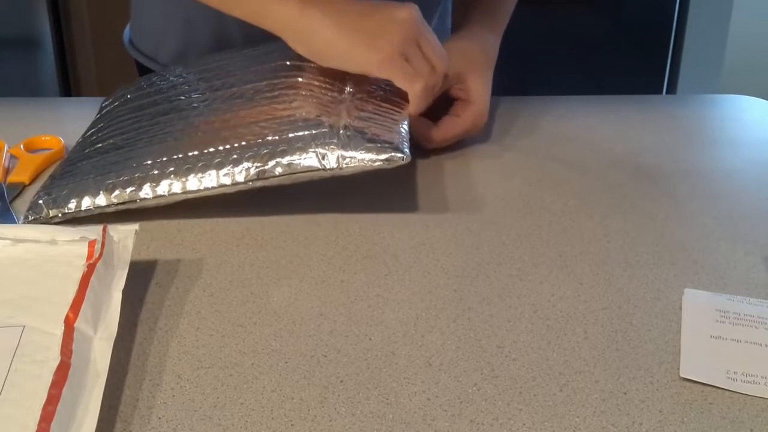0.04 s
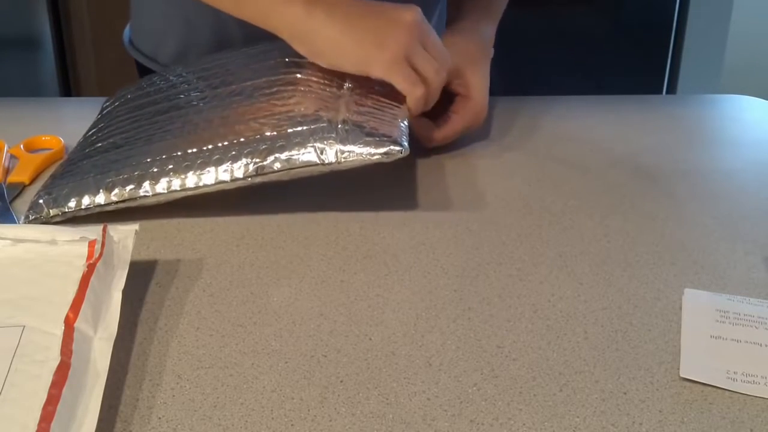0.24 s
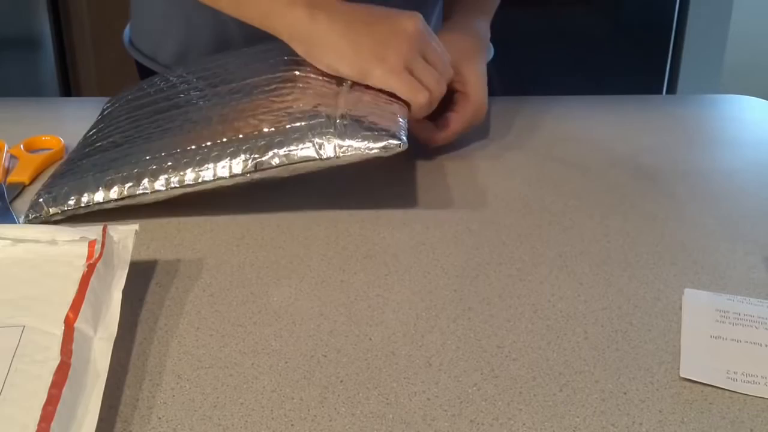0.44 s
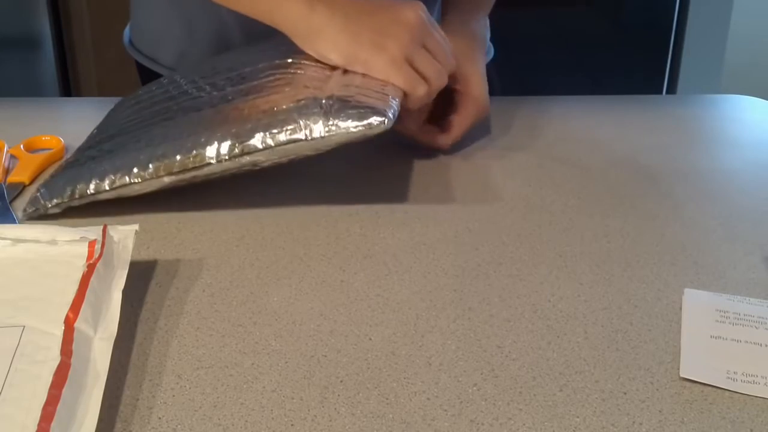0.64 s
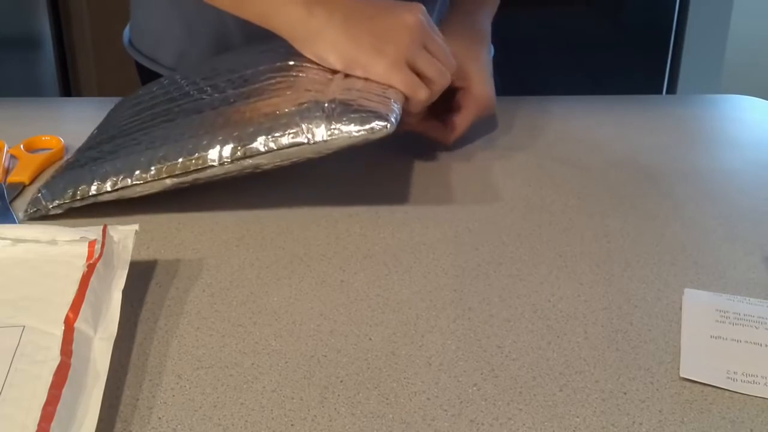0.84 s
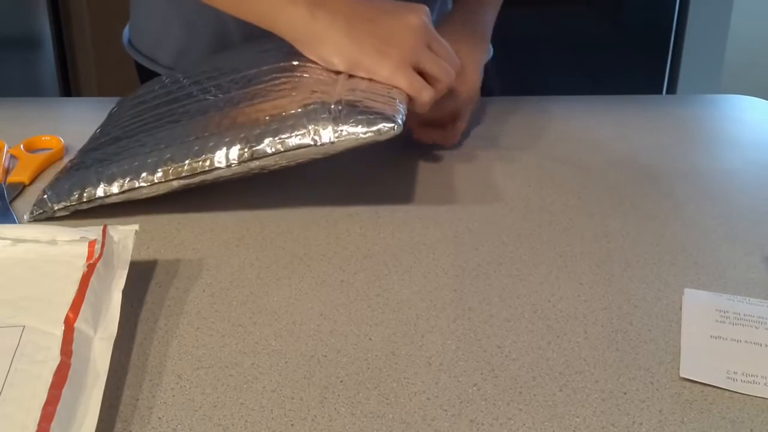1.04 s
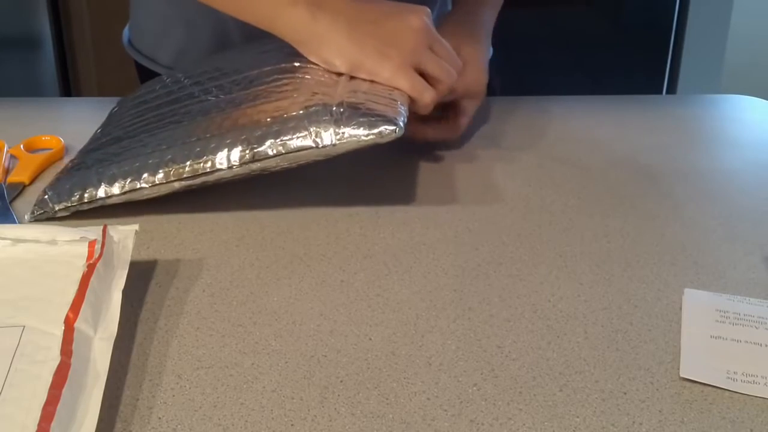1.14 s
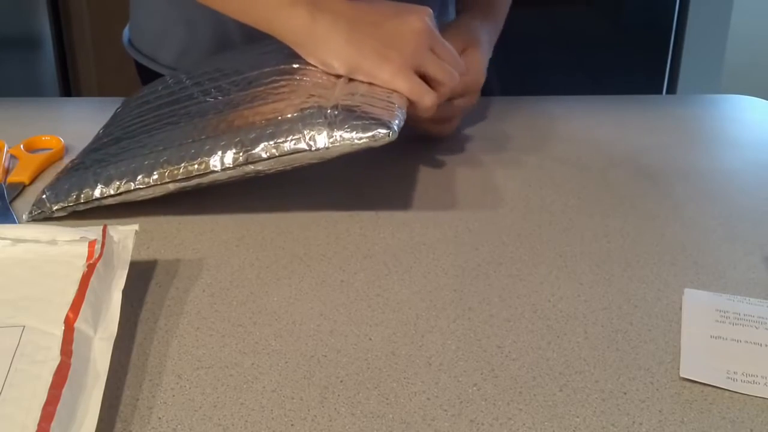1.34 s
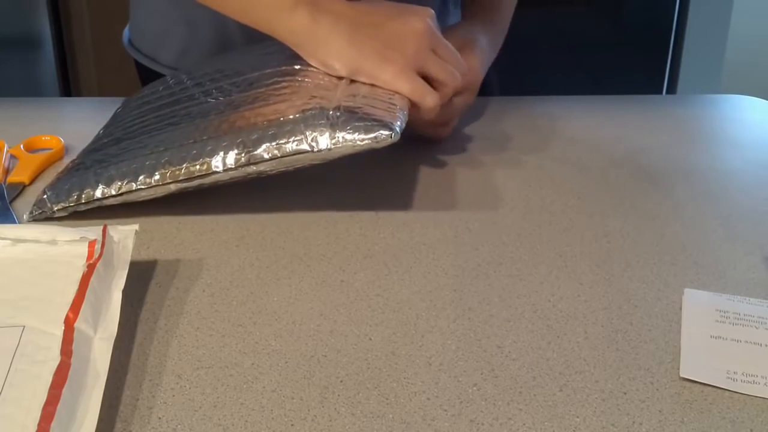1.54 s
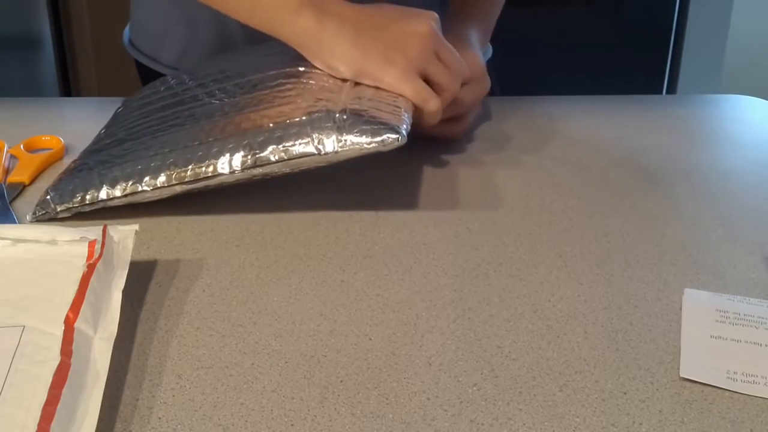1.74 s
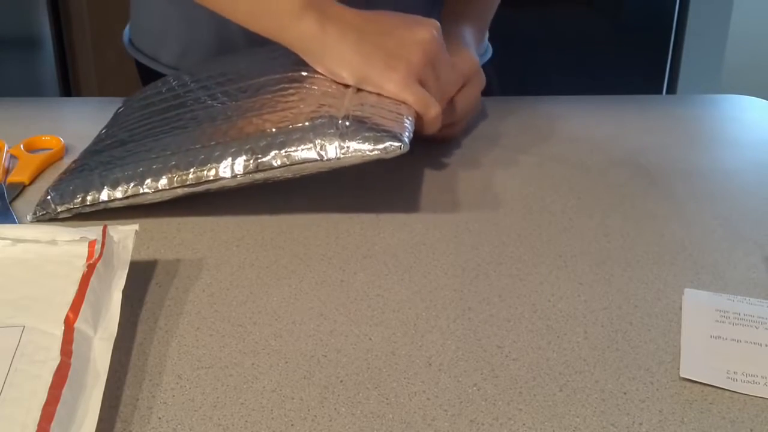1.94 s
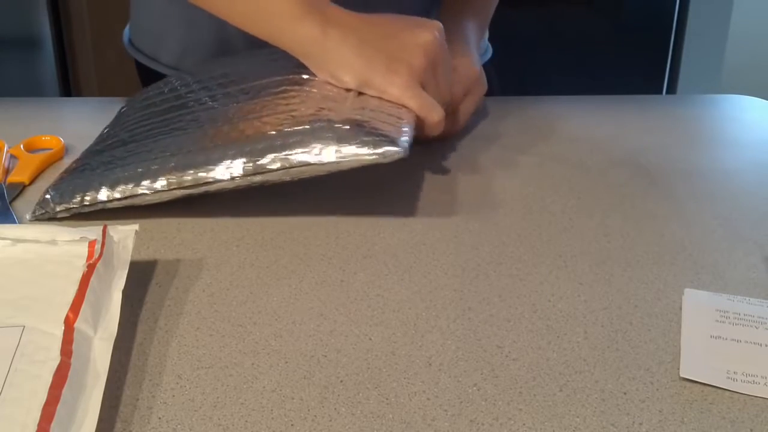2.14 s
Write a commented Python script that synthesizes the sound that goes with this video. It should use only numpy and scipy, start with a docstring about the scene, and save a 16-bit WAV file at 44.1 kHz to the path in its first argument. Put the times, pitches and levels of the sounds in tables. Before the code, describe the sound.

Foil bubble packaging crackles close to a small microphone in a lightly reverberant kitchen. Faint ticks open, a hard snap lands at 0.2 s, more at 0.45 s, then the densest crunch at 0.6-0.67 s runs into a hissing slide fading by 0.9 s. Sparse small ticks and a soft counter bump near 1.04 s follow. A second burst comes at 1.75-1.86 s, a strong snap at 1.95 s, last crackle at 2.2 s, over low hum.

```python
"""Hands pull and fold a foil bubble mailer on a kitchen counter, close to a small microphone.
From the start, noise as air and wavering sines as an appliance hum; filtered grains crackle throughout.
Gliding flicks snap faintly, hard at 0.21 s, densest at 0.59-0.67 s; damped modes knock pouch and counter.
Dense filtered clicks hiss from 0.65 s as the fold slides, dying by 0.93 s; snaps then turn sparse.
A second burst comes at 1.74-1.86 s, a strong snap at 1.95 s, the last at 2.2 s."""
import sys
import numpy as np
from scipy import signal
from scipy.io import wavfile
from scipy.ndimage import uniform_filter1d

SR = 44100
rng = np.random.default_rng(int(sys.argv[2]) if len(sys.argv) > 2 else 0)


def gain_from_db(level_db):
    """Convert decibel levels to linear amplitude factors (20 dB per decade)."""
    decades = np.asarray(level_db, float) / 20
    return 10 ** decades


def generate_wav(signal):
    """Clip the signal to [-1, 1] and save it as 16-bit WAV at the path in sys.argv[1]."""
    frames = np.transpose(np.atleast_2d(signal))
    scaled = np.clip(frames, -1, 1) * 32767
    pcm = np.round(scaled).astype(np.int16)
    wavfile.write(sys.argv[1], SR, pcm)


N = 97020

# room air spectrum, relative: frequency_hz, gain_db
AIR_TONE = [(15, -53), (25, -45.5), (79, -1), (159, -3), (270, -3.5), (327, -9), (387, -10), (656, -5),
            (706, -9.5), (1840, -17), (2290, -20.5), (6920, -23.5), (7800, -17.5), (10100, -33.5),
            (17200, -120)]
# appliance hum partials: pitch_hz, level_db (rms)
HUM_PARTIALS = [(161.5, -66), (327, -58), (652, -61)]
# kitchen reverberation: frequency_hz, t60_s
KITCHEN_DECAY = [(200, 0.9), (600, 0.57), (1500, 0.42), (4000, 0.33), (8000, 0.31)]
# bag thumping the counter: start_s, level_db, pitch_hz
COUNTER_BUMPS = [(.225, -34.5, 139), (.25, -38, 133), (.445, -41, 140), (0.602, -36, 203), (.62, -38, 130),
                 (.65, -37, 110), (.77, -46, 95), (.9, -44, 94), (1.042, -30, 110), (1.06, -39.5, 115),
                 (1.745, -38, 152), (1.819, -47, 120)]
# counter modes: pitch_multiple, level_db (added to the bump's), t60_s
COUNTER_MODES = [(1, 0, .17), (1.5, -8, .1)]
# fingers knocking the hollow pouch: start_s, level_db, pitch_hz
POUCH_KNOCKS = [(.209, -26, 868), (.443, -34, 492), (.605, -27.5, 296), (.636, -40.5, 850),
                (.664, -25, 547), (.9618, -30.5, 723), (1.0362, -38, 441), (1.502, -36.5, 427),
                (1.7425, -25, 596), (1.798, -39, 700), (1.812, -23.5, 780), (1.838, -27, 692),
                (1.908, -28, 884), (1.945, -22, 593), (1.96, -38, 600)]
# hollow pouch modes: pitch_multiple, level_db (added to the knock's), t60_s
POUCH_MODES = [(1, 3.5, 0.034), (1.42, 0.5, 0.026)]
# fold sliding, silent outside: time_s, level_db
SLIDE_LEVEL = [(0.65, -27), (0.658, -26.5), (0.664, -25), (0.678, -26.5), (0.696, -19), (0.908, -47.5),
               (0.922, -51), (0.93, -56)]
# sliding foil spectrum, relative: frequency_hz, gain_db
SLIDE_SPECTRUM = [(120, -28), (200, -13), (451, -17.5), (487, -9), (725, -7), (795, -0.5), (1110, -2.5),
                  (1260, -9), (1340, -5), (1710, 0.5), (2430, -3), (3060, -12), (3510, -1), (3970, -15.5),
                  (4360, -6.5), (6590, -5), (7800, -14.5), (10100, -59.5), (17200, -120)]
# tension of the hands, as crackle level: time_s, level_db
HAND_TENSION = [(0, -51.5), (.19, -59), (.26, -44), (.37, -52), (.45, -29), (.53, -43.5), (.6, -33.5),
                (.66, -32.5), (.85, -48), (1.0, -48), (1.15, -54.5), (1.38, -48), (1.55, -56.5),
                (1.73, -58.5), (1.76, -51), (1.83, -34.5), (1.89, -49), (1.97, -40.5), (2.05, -46.5),
                (2.12, -47), (2.2, -39)]
# crackling foil spectrum, relative: frequency_hz, gain_db
CRACKLE_TONE = [(120, -38), (200, -14), (312, -8), (387, -42), (502, -13.5), (1200, -10.5), (4780, -7),
                (6100, -8), (7220, -2), (7800, -17), (10100, 4.5), (17200, -120)]
# creases snapping: time_s, pouch_db, sheet_db, bright_db, pouch_hz
CREASE_SNAPS = [(0.0255, -47.5, -51.5, -35.5, 660), (0.0624, -43.5, -45, -32, 570),
                (0.1223, -52, -51, -34, 620), (0.2097, -18, -16.5, -10.5, 1430),
                (0.2193, -30.5, -36, -28, 550), (0.2779, -37, -40, -25.5, 1780),
                (0.3431, -35.5, -24.5, -25, 1830), (0.4002, -37.5, -39.5, -20.5, 1780),
                (0.4189, -28, -36, -31, 1430), (0.4245, -20, -32, -25, 1210),
                (0.4436, -19.5, -20.5, -5.5, 1250), (0.449, -25.5, -27.5, -19.5, 1100),
                (0.454, -23.5, -30.5, -22.5, 1000), (0.4679, -29.5, -29, -18.5, 2010),
                (0.493, -36, -33, -22.5, 2170), (0.5475, -41.5, -34, -23, 2080),
                (0.557, -36, -23, -8.5, 1670), (0.5867, -19.5, -15, -8, 2080),
                (0.6041, -13.5, -9.5, -14, 2120), (0.6057, -19.5, -11, -12, 2020),
                (0.619, -14.5, -8.5, -15.5, 2110), (0.6216, -13.5, -15.5, -13, 1270),
                (0.6312, -13.5, -9.5, -10.5, 870), (0.6364, -9.5, -15, -6.5, 830),
                (0.6398, -5, -20.5, -4, 1630), (0.6434, -14, -19, -14.5, 1300),
                (0.6451, -19.5, -23, -20.5, 1390), (0.6648, -8.5, -15, -10.5, 1600),
                (0.6675, -17.5, -16.5, -14, 1530), (0.8788, -29, -37, -36.5, 800),
                (0.9208, -28.5, -40.5, -42, 1250), (0.9627, -23, -14.5, -23, 730),
                (0.998, -35, -38, -34.5, 1230), (1.0371, -28.5, -32, -32, 500),
                (1.0554, -33, -45, -51, 1040), (1.1712, -41.5, -40.5, -39.5, 1180),
                (1.2245, -27.5, -40, -51, 1850), (1.2527, -25.5, -28, -29.5, 1010),
                (1.3409, -40, -32, -18, 1170), (1.351, -42, -42, -33.5, 1200),
                (1.39, -33.5, -41, -34.5, 1280), (1.3953, -44, -43.5, -36, 1300),
                (1.409, -40, -42, -33, 1500), (1.4221, -36, -38, -30.5, 1890),
                (1.503, -27, -30.5, -19.5, 1310), (1.6242, -43, -46, -50, 1090),
                (1.6461, -43.5, -39, -35.5, 690), (1.6877, -34.5, -35, -42, 1230),
                (1.7365, -29, -24.5, -21, 1590), (1.7428, -17.5, -25.5, -15, 2100),
                (1.7459, -22, -28, -16.5, 590), (1.785, -26.5, -30, -25, 1790),
                (1.7933, -32.5, -31.5, -39, 1990), (1.7984, -27.5, -38, -36, 690),
                (1.8014, -30, -30, -17, 2050), (1.8121, -16, -12, -12, 2140),
                (1.8154, -21.5, -20, -12, 2090), (1.8168, -23.5, -22.5, -20, 730),
                (1.8238, -27.5, -27.5, -26, 690), (1.8304, -29.5, -31, -21, 720),
                (1.8405, -27, -30, -30, 710), (1.8622, -32, -26, -24, 500),
                (1.9085, -17, -21.5, -22.5, 1680), (1.9455, -8.5, -9.5, -8.5, 1230),
                (1.981, -36, -32, -34, 1500), (2.019, -40.5, -38, -19, 1990),
                (2.0265, -40, -39, -27.5, 1800), (2.042, -26, -21.5, -17.5, 1220),
                (2.1468, -38, -29, -40, 650), (2.1506, -36, -26, -29, 1290), (2.189, -33.5, -31, -37, 1310),
                (2.1982, -21, -17.5, -29, 1270)]

AIR_DB = -50
HUM_WAVER_DB, HUM_WOBBLE_RAD = 1.5, .25  # rms level waver, rms phase wobble
KITCHEN_DB, KITCHEN_FADE_IN_S = -9, 0.0013
BUMP_CONTACT_S, KNOCK_CONTACT_S = 0.0063, 0.00074  # length of the soft contact
SLIDE_GRAINS_PER_S, SLIDE_SIZE_DB, SLIDE_PATCHY_DB = 9000, 2.5, 1.2
CRACKLES_PER_S, CRACKLE_SIZE_DB, CRACKLE_PEAK_CYCLES = 2100, 2, 1.1
POUCH_PEAK_CYCLES = .85  # cycles until the pouch ring peaks
SHEET_HZ, SHEET_PEAK_S = 3710, .0005
BRIGHT_HZ, BRIGHT_PEAK_S = 6094, .0005
PITCH_SPREAD = .045  # sheet and bright pitch vary by this fraction (sd)
RATTLE_DB, RATTLE_T60_S, RATTLE_SHARE = -2, 0.037, 0.088  # before colouring; share of samples that fire
GLIDE_PER_S = 134  # upward glide of each ring, as a fraction of its pitch per second
FOIL_LOW_HZ = 280  # thin foil radiates little bass
CEILING = .75  # soft limit of the microphone, linear
EDGE_HZ, LOW_HZ = 7490, 80.4


def evened(x):
    """Scales to unit rms."""
    return x / np.sqrt(np.mean(x ** 2) + 1e-20)


def read(points, hz):
    """Reads a table along log frequency."""
    f_hz, value = np.transpose(points)
    return np.interp(np.log(hz + 1), np.log(f_hz + 1), value)


def curve(points):
    """Gain over time; a table that starts late is silent outside its span."""
    time_s, db = np.transpose(points)
    left_db, right_db = (db[0], db[-1]) if time_s[0] < .1 else (-120, -120)
    return gain_from_db(np.interp(np.arange(N) / SR, time_s, db, left=left_db, right=right_db))


def add(mix, start_s, sound):
    """Adds a sound in place, cut at the end of the mix."""
    part = mix[round(start_s * SR):][:len(sound)]
    part += sound[:len(part)]


def coloured(x, tone):
    """Minimum-phase filter with the given spectrum, floored at -80 dB."""
    gain_db = np.maximum(read(tone, abs(np.fft.fftfreq(4096, 1 / SR))), -80)
    log_gain = np.log(gain_from_db(gain_db))
    taps = np.fft.ifft(np.exp(np.conj(signal.hilbert(log_gain)))).real[:2048]
    return signal.oaconvolve(x, taps)[:N]


def ring(hz, db, t60_s):
    """One exponentially dying mode."""
    t = np.arange(round(t60_s * SR) + 8) / SR
    return gain_from_db(db - 60 * t / t60_s) * np.sin(2 * np.pi * hz * t)


def struck(blows, modes, contact_s):
    """Blows into damped modes, each blow at its own pitch; a soft contact dulls the onset."""
    out = np.zeros(N)
    push = np.hanning(round(contact_s * SR) + 3)
    push = push / push.sum()
    for start_s, db, hz in blows:
        for multiple, mode_db, t60_s in modes:
            add(out, start_s, np.convolve(ring(hz * multiple, db + mode_db, t60_s), push))
    return out


def clicks(per_s, size_db):
    """Sparse clicks of random sign, a few of them large."""
    size = gain_from_db(size_db * np.minimum(rng.exponential(1, N), 4))
    return size * rng.choice([-1., 1.], N) * (rng.random(N) < per_s / SR)


def flick(hz, db, peak_s, turn):
    """A few cycles that swell, glide upward through hz at the peak, and die."""
    t = np.arange(512) / SR
    cycles = hz * (t + GLIDE_PER_S * (t / 2 - peak_s) * np.minimum(t, 4 * peak_s))
    swell = (t / peak_s * np.exp(1 - t / peak_s)) ** 2
    return gain_from_db(db) * swell * np.sin(2 * np.pi * (cycles + turn))


def grains(per_s, size_db, tone):
    """Small creases, each a flick at one of 16 pitches."""
    pitches_hz = np.geomspace(500, 7500, 16)
    out = np.zeros(N)
    for hz in pitches_hz:
        shape = hz * flick(hz, 0, CRACKLE_PEAK_CYCLES / hz, 0)
        out += signal.oaconvolve(clicks(per_s / len(pitches_hz), size_db), shape)[:N]
    return evened(coloured(out, tone))


def slow_drift():
    """Unit-rms sum of sines between 2 and 12 Hz."""
    t = np.arange(N) / SR
    return evened(sum(np.sin(2 * np.pi * (hz * t + rng.random())) for hz in np.geomspace(2, 12, 12)))


def air():
    """Room air: steady filtered noise."""
    return gain_from_db(AIR_DB) * evened(coloured(rng.standard_normal(N), AIR_TONE))


def hum():
    """Appliance hum: partials that waver in level and phase."""
    t, out = np.arange(N) / SR, np.zeros(N)
    for hz, db in HUM_PARTIALS:
        gain = np.sqrt(2) * gain_from_db(db + HUM_WAVER_DB * slow_drift())
        out += gain * np.sin(2 * np.pi * hz * t + HUM_WOBBLE_RAD * slow_drift())
    return out


def kitchen(x):
    """Dense noise tail, each band dying at its own speed."""
    noise = rng.standard_normal(SR // 2)
    hz, t, z = signal.stft(noise, SR, nperseg=128)
    decay = gain_from_db(-60 * t / read(KITCHEN_DECAY, hz)[:, None])
    tail = signal.istft(z * decay, SR, nperseg=128)[1]
    tail = tail * np.clip(np.arange(len(tail)) / SR / KITCHEN_FADE_IN_S, 0, 1)
    return gain_from_db(KITCHEN_DB) * signal.fftconvolve(x, tail / np.linalg.norm(tail))[:N]


def bumps():
    """The bag thumps the counter, exciting low modes."""
    return struck(COUNTER_BUMPS, COUNTER_MODES, BUMP_CONTACT_S)


def knocks():
    """Fingers knock the hollow pouch; its pitch follows the grip."""
    return struck(POUCH_KNOCKS, POUCH_MODES, KNOCK_CONTACT_S)


def slide():
    """Dense slips of foil on foil, uneven in time and pitch."""
    slips = coloured(clicks(SLIDE_GRAINS_PER_S, SLIDE_SIZE_DB), SLIDE_SPECTRUM)
    z = signal.stft(slips, nperseg=128)[2]
    patches = uniform_filter1d(rng.standard_normal(z.shape), 3, axis=0)
    patches = evened(uniform_filter1d(patches, 8, axis=1))
    rough = signal.istft(z * gain_from_db(SLIDE_PATCHY_DB * patches), nperseg=128)[1][:N]
    return curve(SLIDE_LEVEL) * evened(rough)


def crackle():
    """Tiny creases, as strong as the hands pull."""
    return curve(HAND_TENSION) * grains(CRACKLES_PER_S, CRACKLE_SIZE_DB, CRACKLE_TONE)


def snaps():
    """Each crease flicks pouch, sheet and bright ring, then neighbouring creases let go in a rattle."""
    out, rattle = np.zeros(N), np.zeros(N)
    t = np.arange(2048) / SR
    rattle_gain = gain_from_db(RATTLE_DB - 60 * t / RATTLE_T60_S) / np.sqrt(RATTLE_SHARE)
    for time_s, pouch_db, sheet_db, bright_db, pouch_hz in CREASE_SNAPS:
        sheet_luck, bright_luck, pouch_turn, sheet_turn, bright_turn = rng.standard_normal(5)
        sheet_hz = SHEET_HZ * (1 + PITCH_SPREAD * sheet_luck)
        bright_hz = BRIGHT_HZ * (1 + PITCH_SPREAD * bright_luck)
        pouch_peak_s = POUCH_PEAK_CYCLES / pouch_hz
        # start early: each ring peaks just before time_s
        add(out, time_s - pouch_peak_s - .0004, flick(pouch_hz, pouch_db, pouch_peak_s, pouch_turn))
        add(out, time_s - SHEET_PEAK_S - .0003, flick(sheet_hz, sheet_db, SHEET_PEAK_S, sheet_turn))
        add(out, time_s - BRIGHT_PEAK_S - .0002, flick(bright_hz, bright_db, BRIGHT_PEAK_S, bright_turn))
        strength = np.linalg.norm(gain_from_db([pouch_db, sheet_db, bright_db]))
        sparse = rng.standard_normal(2048) * (rng.random(2048) < RATTLE_SHARE)
        add(rattle, time_s, strength * rattle_gain * sparse)
    return out + coloured(rattle, CRACKLE_TONE)


def scene():
    """Foil sounds with their room tail, over bumps, air and hum."""
    high_pass = signal.butter(2, FOIL_LOW_HZ, "high", fs=SR, output="sos")
    foil = signal.sosfilt(high_pass, snaps() + knocks())
    bag = foil + crackle() + slide()
    return (bag + kitchen(bag) + bumps() + air() + hum())[None]


def band_limit(x):
    """A steep low-pass at the top of the band."""
    return signal.sosfilt(signal.butter(12, 8580, fs=SR, output="sos"), x)


def record(dry):
    """The microphone rounds off peaks and drops deep bass; a steep band limit smears the treble."""
    rounded = CEILING * np.tanh(dry / CEILING)
    steep = signal.cheby1(9, .6, EDGE_HZ, fs=SR, output="sos")  # order, ripple_db
    low = signal.butter(3, LOW_HZ, "high", fs=SR, output="sos")
    mix = signal.sosfilt(np.vstack([steep, low]), rounded)
    return band_limit(mix)


dry = scene()
out = record(dry)
generate_wav(out)
```